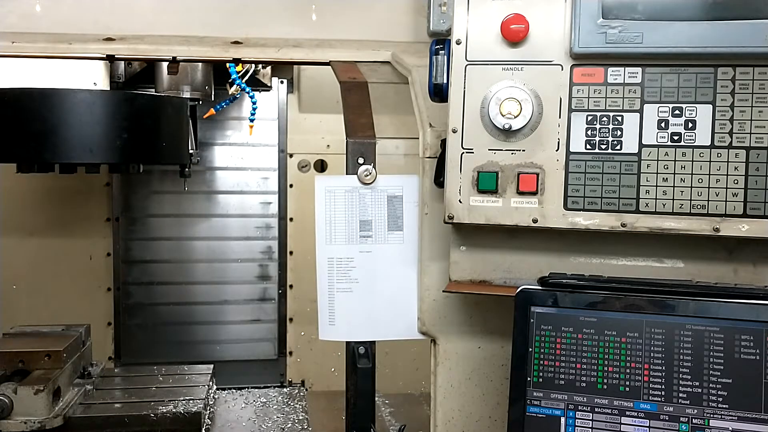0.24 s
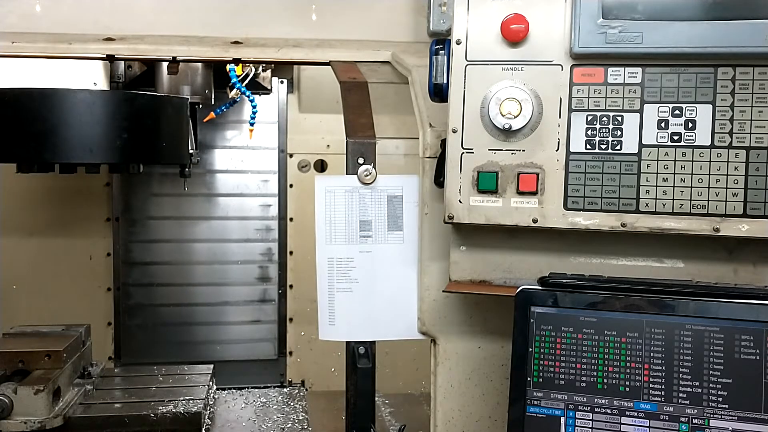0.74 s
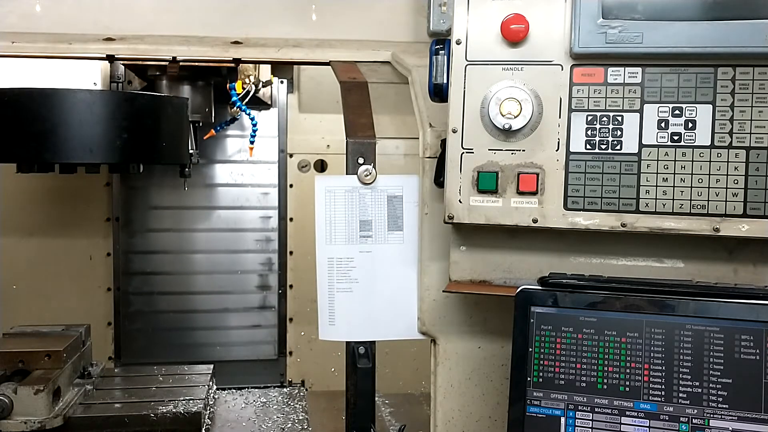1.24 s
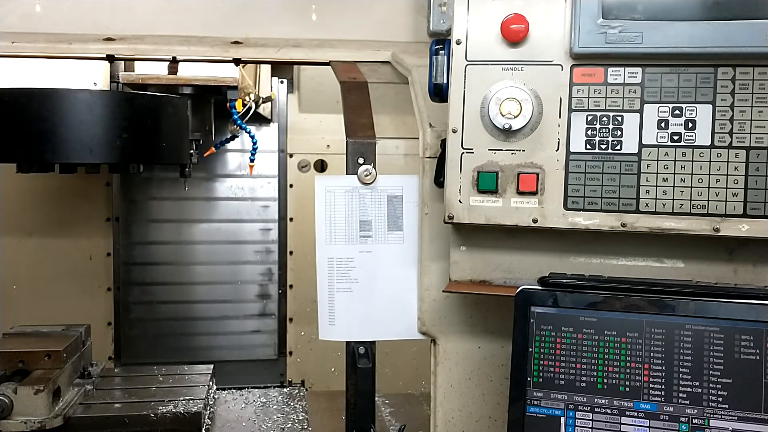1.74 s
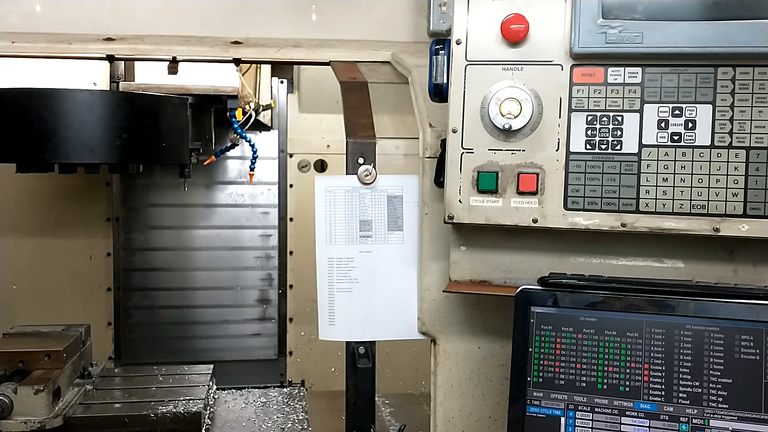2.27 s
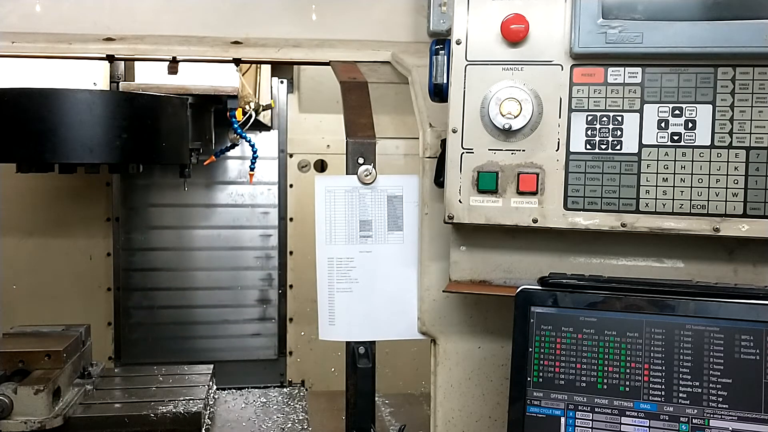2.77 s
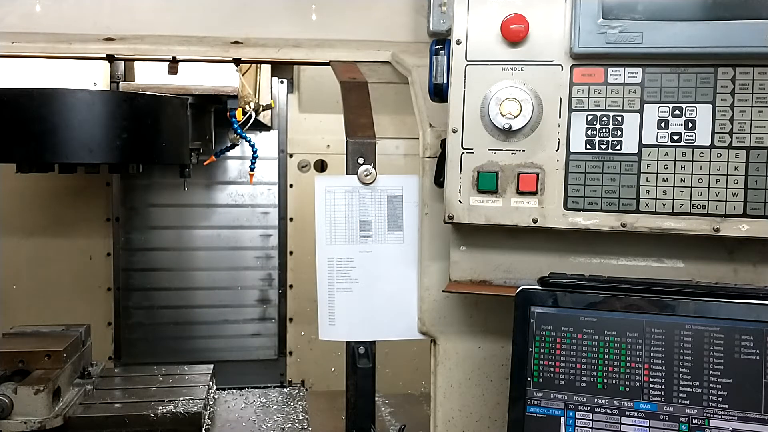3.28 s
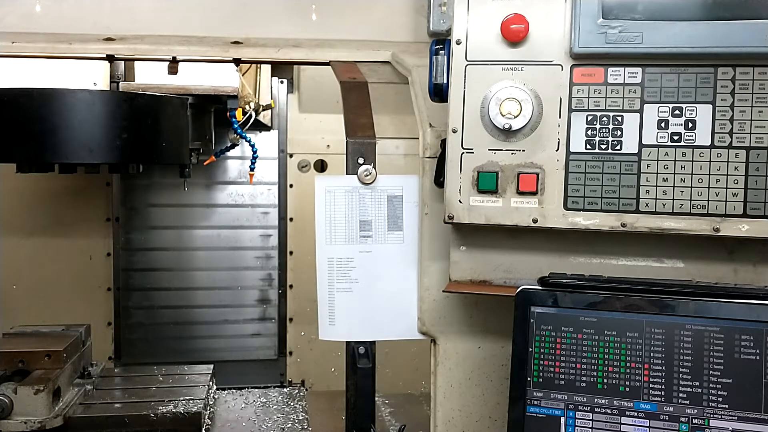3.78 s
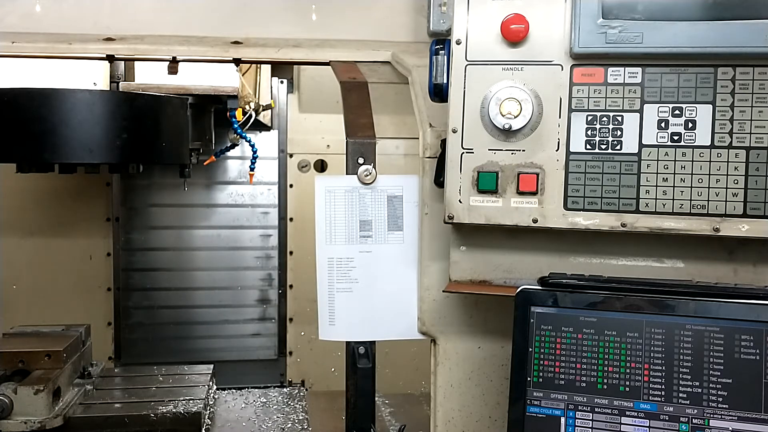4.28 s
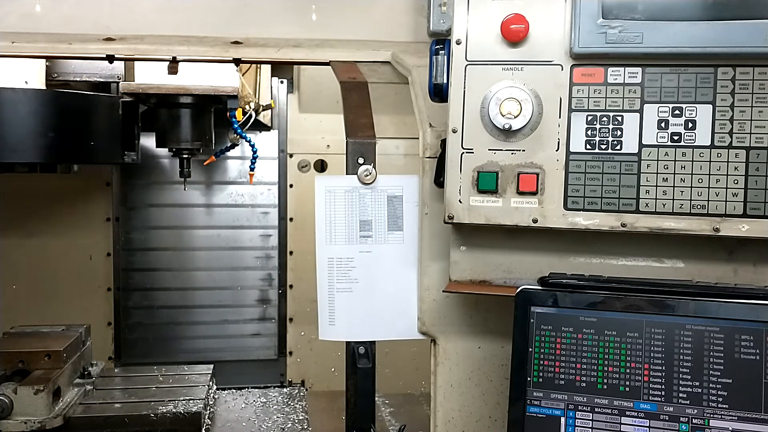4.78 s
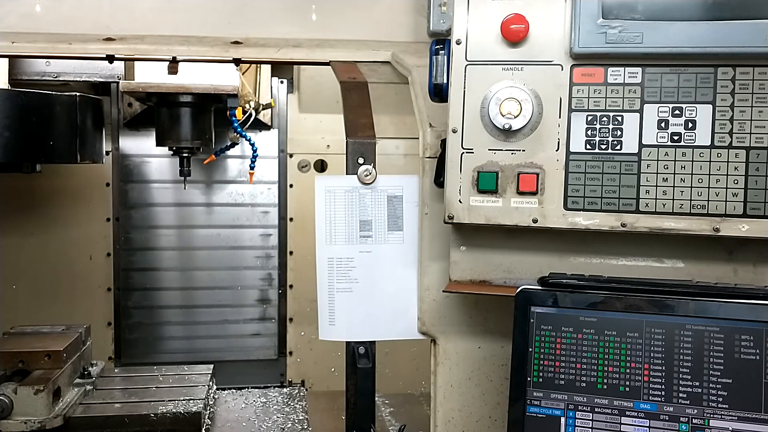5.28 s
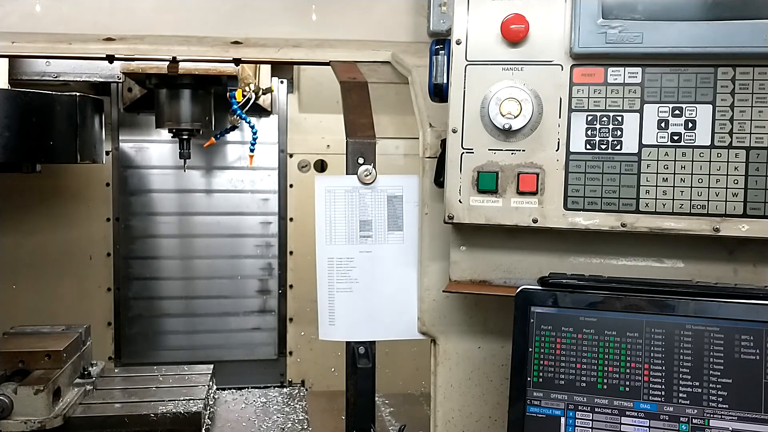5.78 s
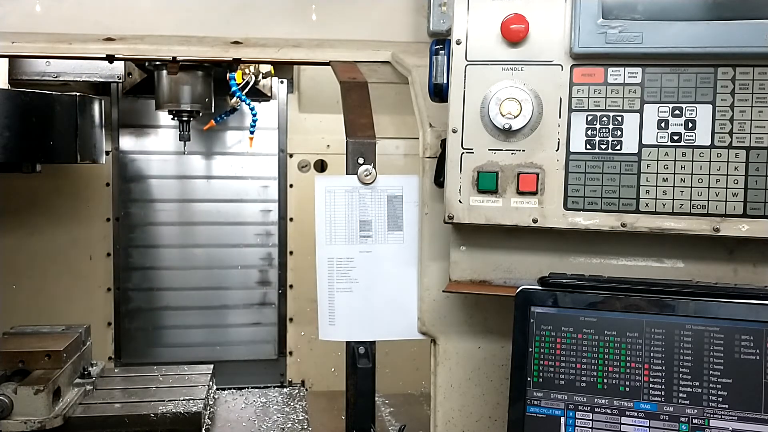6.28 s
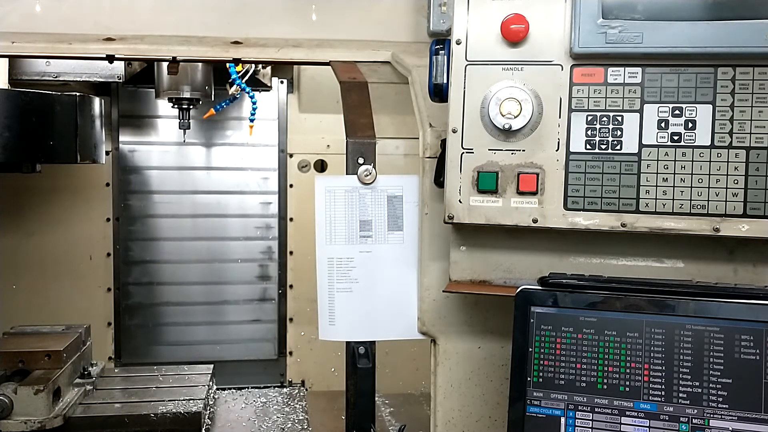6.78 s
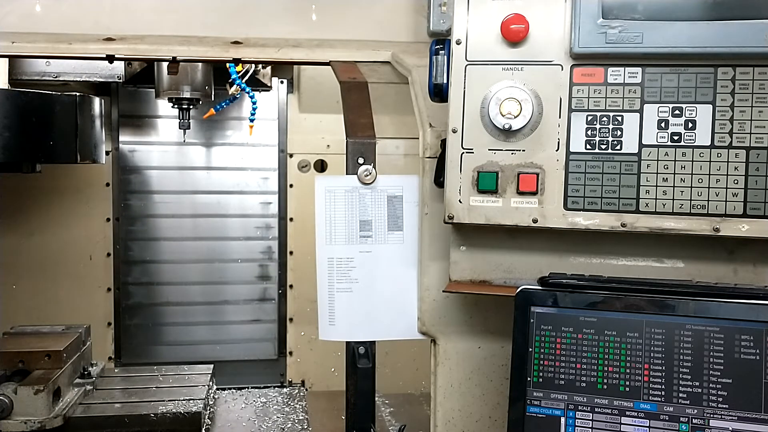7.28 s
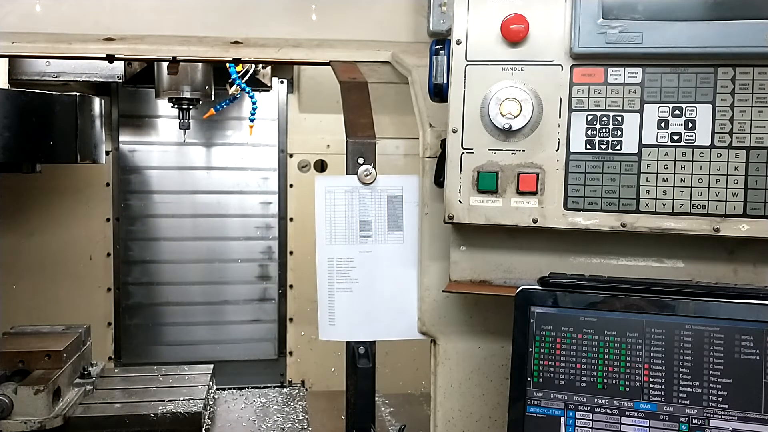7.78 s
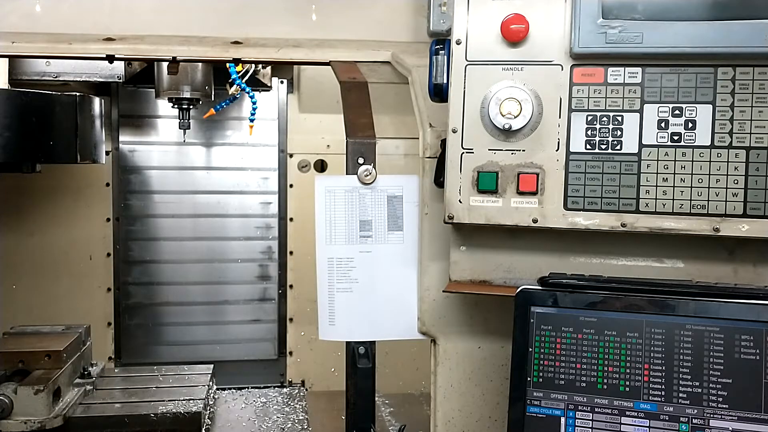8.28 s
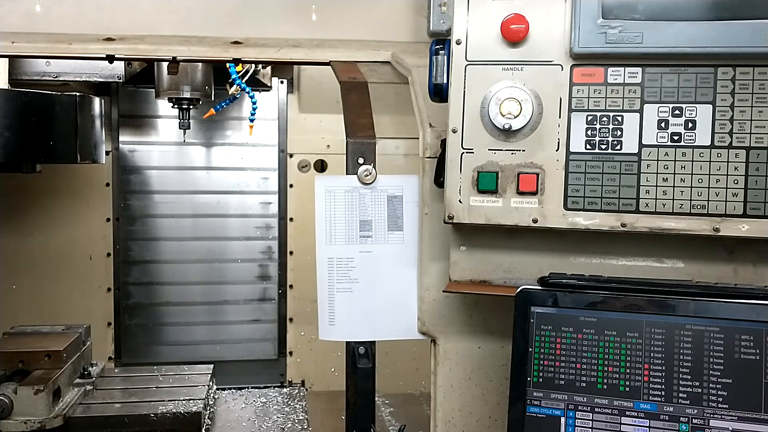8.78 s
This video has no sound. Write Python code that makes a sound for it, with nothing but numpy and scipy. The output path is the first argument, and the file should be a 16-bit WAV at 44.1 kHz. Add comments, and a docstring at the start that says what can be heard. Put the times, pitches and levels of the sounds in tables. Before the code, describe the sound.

Close to a milling machine in a workshop, a tool change opens with a strong hissing rush of air, echoing briefly off steel walls. It narrows to a squeal and stops, followed by clunks and a quick exhaust hiss. A small motor then whines, rattles and hits its end stop. A feed drive growls for over a second and a valve gives a sharp puff, leaving the steady fan and mains hum.

```python
"""A roar of air from a milling machine's spindle taper opens a tool change. As the head sinks onto the
holder, the air thins to a whistle and is shut off; the drawbar clamps with a clunk and vents.
The carousel's motor whines into its end stop, the head rises on a growling servo and a valve puffs.
Fans and mains hum throughout; the sheet-metal enclosure echoes around the air blasts."""
import sys
import numpy as np
from scipy import signal
from scipy.fft import rfft, irfft, next_fast_len
from scipy.io import wavfile
from scipy.ndimage import uniform_filter1d, map_coordinates

SR = 44100
rng = np.random.default_rng(int(sys.argv[2]) if len(sys.argv) > 2 else 0)


def transcribe(signal):
    """Save signal, clipped to [-1, 1], as a 16-bit WAV file at the path in sys.argv[1]."""
    frames = np.atleast_2d(signal).T
    limited = np.clip(frames, -1, 1)
    pcm = np.round(limited * 32767).astype(np.int16)
    wavfile.write(sys.argv[1], SR, pcm)


N = 398220
T = np.arange(N) / SR

# the spindle sinking onto the holder: time_s, closure (0 open, 1 seated)
GAP_CLOSURE = [(.95, 0.019), (1.15, 0.095), (1.5, 0.32), (1.745, 0.63), (1.83, 0.88), (1.94, 0.96)]
# the jet's level as the gap closes: open_db, turn_closure, turn_db, seated_db
JET_THROTTLE = (-15.5, 0.78, -17, -41.5)
# metallic crack of struck panels: freq_hz, level_db
CRACK_SPECTRUM = [(250, -13), (600, 8), (900, -2), (1200, -5), (1600, 5.5), (2300, 5), (4000, 2),
                  (5200, -3), (7300, 13), (11000, -9), (16000, -16)]
PURGE_OFF_S, PURGE_FALL_DB_PER_S = 1.998, 193


def air_purge():
    """The jet roars; the closing gap retunes the cavity, hisses higher and at last whistles."""
    # roar of the jet and hiss of the gap: freq_hz, level_db
    jet_spectrum = [(300, -84), (700, -32), (1200, -17), (1950, -15.5), (2400, -2), (3000, -2), (3600, -2),
                    (4900, -3), (5700, -8), (6700, -11), (8500, -4), (9800, -4), (11500, -13.5),
                    (13000, -30), (14600, -7), (16000, -28)]
    gap_spectrum = [(500, -21), (1500, -7.5), (2500, -2.5), (4200, -12), (6500, -2.5), (9500, -2.5),
                    (12000, -0.5), (14000, -6), (16000, -12)]
    # the hiss as the gap closes: open_db, turn_closure, turn_db, seated_db
    gap_throttle = (-29, 1.1, -27.5, -33.5)
    # cavity between taper and holder:
    # open_hz, seated_hz, width_hz, open_db, turn_closure, turn_db, seated_db
    cavity_modes = [(1049, 700, 70, -44.5, 0.35, -32.5, -40), (2710, 2860, 125, -45, 0.91, -26, -34),
                    (2860, 3400, 99, -48, 0.06, -19.5, -58), (6630, 5380, 270, -44, 0.54, -17, -35),
                    (9130, 9250, 420, -39, 0.86, -18, -43)]
    # the gap's edge tone catching: start_s, length_s, pitch_hz, level_db
    chirps = [(1.745, .06, 13500, -27), (1.868, 0.023, 14080, -26), (1.937, 0.017, 12700, -10),
              (1.972, .025, 12730, -19.5)]
    closure = curve(GAP_CLOSURE)
    roar = undb(-1) * noise(colour(jet_spectrum), band=(3300, 4900)) * throttled(closure, *JET_THROTTLE)
    hiss = noise(colour(gap_spectrum), band=(10800, 12200)) * throttled(closure, *gap_throttle)
    surge = undb(.5 * walk(8.73))
    air = holder_echo(roar * surge + hiss)
    for open_hz, seated_hz, width_hz, *throttle in cavity_modes:
        ring = blown(open_hz + (seated_hz - open_hz) * closure, width_hz)
        air += ring * throttled(closure, *throttle) * undb(walk(18))
    # just before it seals, the slit shrieks upwards
    shriek_s, hold_s = 1.85, .07
    shriek = blown(10760 + 26000 * np.clip(T - shriek_s, 0, hold_s), width_hz=3200)
    air += undb(-16.5) * shriek * envelope(shriek_s, shriek_s + hold_s, rise_s=.024, fall_db_per_s=480)
    for start, length, hz, db in chirps:
        gate = envelope(start, start + length, rise_s=.012, fall_db_per_s=478.5)
        air += undb(db) * tone(hz, spread_hz=70, rate=400) * gate
    flutter_db = .58 * walk(59.26)
    return air * undb(flutter_db) * shutoff()


def holder_echo(air):
    """The holder's face throws the treble back; as it nears, the echo's comb sweeps upwards."""
    # the reflection: time_s, lag_ms, gain
    echo = [(.55, .6, 0), (.9, .5, .17), (1.12, .447, .25), (1.4, .4, .22), (1.75, .34, 0)]
    treble = filtered(air, lambda f: treble_share(f, 4000))
    delayed = map_coordinates(treble, [(T - curve(echo) / 1000) * SR], order=3)
    return air + curve(echo, column=2) * delayed


def spindle_nose():
    """The wandering jet rings the spindle nose, favouring now some resonances, now others."""
    # ring of the nose: pitch_hz, width_hz, level_db
    modes = [(2602, 11, 3), (2632, 10, -2), (2746, 11, 7.5), (2838, 14, -2), (2931, 12, -1), (3441, 14, 4),
             (3589, 17, 1.5), (3676, 15, 1), (4197, 12, -6), (4239, 12, -3), (4412, 12, -3), (4664, 18, -3),
             (4885, 16, -5), (8470, 50, -7), (9117, 16, -3)]
    ring = sum(filtered(rng.standard_normal(N), resonances(modes[k::3])) * undb(1.5 * walk(4))
               for k in range(3))
    flow = throttled(curve(GAP_CLOSURE), *JET_THROTTLE) * shutoff()
    return undb(-1) * flow * ring / ring.std()


def exhausts():
    """The drawbar cylinder dumps its air and the rest seeps out; a valve puffs once the head stops."""
    # rush of the drawbar vent and of the valve: freq_hz, level_db
    vent_spectrum = [(300, -13), (1400, -9), (3300, -6), (4200, -3), (5500, -2.5), (7200, 0.5), (9300, 2),
                     (11000, -5), (13000, -6.5), (16000, -15)]
    puff_spectrum = [(800, -34), (2500, -11), (4000, -12), (5200, -6), (6600, -8), (8300, 3.5), (9700, 1),
                     (11000, -13), (13000, -13), (16000, -23)]
    # ring of the exhaust port: pitch_hz, width_hz, level_db, sag_db_per_s
    port_modes = [(4140, 200, -35, 15), (5550, 280, -35, 45), (7130, 430, -24, 140)]
    vent_s, dumped_s = 2.234, 2.414
    dump = undb(-18) * envelope(vent_s, dumped_s, rise_s=.014, fall_db_per_s=200, sag_db_per_s=61)
    seep = undb(-37.5) * envelope(vent_s, 2.764, rise_s=.12, fall_db_per_s=60, sag_db_per_s=20.5)
    puff = undb(-29) * envelope(6.858, 6.88, rise_s=.011, fall_db_per_s=131, sag_db_per_s=40)
    air = noise(colour(vent_spectrum)) * (dump + seep) + noise(colour(puff_spectrum)) * puff
    for hz, width_hz, db, sag in port_modes:
        rush = envelope(vent_s, dumped_s, rise_s=.017, fall_db_per_s=200, sag_db_per_s=sag)
        air += undb(db) * blown(hz, width_hz) * rush
    # the port whistles as the pressure runs out
    whistle = undb(-38) * envelope(2.375, 2.437, rise_s=.02, fall_db_per_s=300, sag_db_per_s=70)
    return air + blown(12300, width_hz=120) * whistle


def clunks():
    """The drawbar clamps, the carousel knocks into its stop and the valve's spool clacks home."""
    # hits on each body: start_s, ring_db, contact_cutoff_hz, crack_db
    head_blows = [(2.035, -35.5, 404, -52), (2.078, -32, 304, -40), (2.236, -30.5, 1500, -28.5),
                  (2.245, -58.5, 1474, -27), (2.259, -37, 1500, -51), (2.312, -29, 130, -66),
                  (2.331, -26, 126, -62)]
    carousel_blows = [(4.405, -40, 196, -46), (4.587, -58, 3500, -32.5), (4.604, -56, 3500, -40.5),
                      (4.752, -35, 179, -63), (4.852, -38, 177, -65), (5.186, -34, 2950, -54),
                      (5.196, -30.5, 2000, -37), (5.208, -32.5, 1500, -62), (5.231, -31.5, 1100, -63),
                      (5.265, -44, 1496, -70)]
    valve_blows = [(6.898, -37.5, 6000, -31.5)]
    # ring of each body: pitch_hz, level_db, t60_s
    head_modes = [(74, -18, 0.98), (106, -3.5, 0.36), (122, -13, 0.29), (152, -6.5, 0.49), (206, -2, 0.17),
                  (410, -12, 0.12), (567, -7, 0.13), (686, -9, 0.3), (924, -2, 0.11), (1436, -6, 0.09),
                  (1470, -17, .2), (2940, 6.5, 0.086)]
    carousel_modes = [(133.5, -4.5, 0.55), (188, -3, 0.307), (335, -11, 0.073), (416, 1.5, 0.088),
                      (456, 2, 0.045), (651, -5, 0.21), (882, -4.5, 0.19), (1470, -11, 0.18),
                      (1610, -11, 0.46), (1910, -11, 0.4), (2960, -19, 0.28), (3360, -13.5, .25),
                      (3760, -1, .25)]
    valve_modes = [(1550, -5, 0.57), (1680, 2, 0.29), (1750, -9, 0.23), (2730, -7, 0.43), (3600, -6, 0.39),
                   (4320, -5, 0.28)]
    # broader clack of the carousel's carriage: freq_hz, level_db
    clack = [(250, -12), (600, -6), (1300, 5.5), (2300, 2.5), (4000, 3), (5200, -5), (7300, 10), (10000, 0),
             (13000, -5), (16000, 2)]
    return (strike(head_blows, head_modes, CRACK_SPECTRUM, crack_t60=.27, boom_db=0, boom_t60=.14)
            + strike(carousel_blows, carousel_modes, clack, crack_t60=.29, boom_db=-4.5, boom_t60=.4)
            + strike(valve_blows, valve_modes, CRACK_SPECTRUM, crack_t60=.43, boom_db=-20, boom_t60=.15))


def strike(blows, modes, crack_spectrum, crack_t60, boom_db, boom_t60):
    """Each blow cracks, rings the body and booms in its panels; a soft contact dulls ring and boom."""
    # dull boom of the panels: freq_hz, level_db
    boom_spectrum = [(70, -10), (140, 7.5), (260, -7.5), (450, 6), (900, -4), (1150, -8.5), (1700, -1),
                     (3000, -9), (5000, -26)]
    out, t = np.zeros(N), T[:SR // 3]
    hz, mode_db, t60 = np.transpose(modes)[:, :, None]
    polarity = (-1) ** np.arange(len(hz))[:, None]
    decay = polarity * undb(mode_db - 60 * t / t60)
    crack, boom = noise(colour(crack_spectrum)), noise(colour(boom_spectrum))
    for start, ring_db, contact_hz, crack_db in blows:
        span = slice(int(start * SR), int(start * SR) + len(t))
        detune = 1 + .0161 * rng.standard_normal(hz.shape)
        ring = (decay * np.sin(2 * np.pi * hz * detune * t)).sum(0)
        ring += undb(boom_db - 60 * t / boom_t60) * boom[span]
        softened = signal.lfilter(*signal.butter(2, contact_hz, fs=SR), ring)
        out[span] += undb(ring_db) * softened + undb(crack_db - 60 * t / crack_t60) * crack[span]
    return out


def carousel(start_s=4.32, stop_s=5.2, spin_up_s=.085, chatter_db=2.2):
    """A motor whines and its brushes chatter; the carriage rumbles and rubs along its rail."""
    # the whine follows the motor's speed: time_s, pitch_hz
    whine_pitch = [(4.33, 1677), (4.39, 1798), (4.46, 1854), (4.55, 1860), (4.68, 1856), (5.09, 1913),
                   (5.21, 1893)]
    # its harmonics, from the first up: level_db
    harmonics = [-0.5, -13, -9, -2, -1, -11, -11, -17]
    # level ride on the first harmonic: time_s, gain_db
    lowest_ride = [(4.42, -1), (4.56, -11), (4.82, -3.5), (4.92, 1.5), (5.02, 3.5), (5.2, 1)]
    # scratch of the brushes, also heard in the rubs: freq_hz, level_db
    scratch = [(400, 5.5), (1200, -4), (3000, 1), (4500, -12), (6500, 2), (9000, 1.5), (11500, -9),
               (16000, -21)]
    # rubs on the rail before the stop: start_s, length_s, level_db
    rubs = [(5.07, 0.037, -40.5), (5.149, 0.097, -40)]
    hz, age = curve(whine_pitch) + 3 * walk(40), T - start_s
    lowest, *upper = [undb(db) * tone(k * hz, spread_hz=12 * k, rate=300)
                      for k, db in enumerate(harmonics, 1)]
    whine = sum(partial * undb(chatter_db * walk(40)) for partial in upper)
    whine += lowest * undb(curve(lowest_ride))
    # weaker tones between the harmonics
    whine += undb(-14) * sum(tone((k + .5) * hz, spread_hz=16.4, rate=430) for k in range(3, 8))
    whine *= undb(-51 + 1.5 * age)
    brushes = noise(colour(scratch)) * undb(-46 - 3 * age + chatter_db * walk(110))
    motor = (whine + brushes) * np.clip(age / spin_up_s, 0, 1)
    rumble = noise(resonances([(90, 22, 5), (126, 9.1, 14), (199, 42, 3.5), (400, 150, -16)]))
    rumble *= undb(-45.5 + 2 * walk(11)) * envelope(start_s, 4.82, rise_s=.02, fall_db_per_s=90)
    rub = noise(resonances([(3026, 95, 4), (3400, 61, -1), (3730, 100, 0)]))
    rub += undb(.5) * noise(colour(scratch))
    rub *= sum(undb(db) * envelope(start, start + length, rise_s=.027, fall_db_per_s=200)
               for start, length, db in rubs)
    return (motor + rumble) * envelope(start_s, stop_s, rise_s=.017, fall_db_per_s=198) + rub


def axis_drive(rise_s=.13, swell_db_per_s=2):
    """Balls rolling in the feed screw ring the column; the servo's growl swells along each move."""
    # moves of the head: start_s, stop_s, screw_db, servo_db
    moves = [(0.715, 2.002, -45, -50), (1.984, 2.149, -40.5, -46), (5.285, 6.65, -41.5, -46)]
    # ring of the column and of the servo drive: pitch_hz, width_hz, level_db
    column_modes = [(664, 15.7, 3), (703, 12, -3), (846, 34, -9)]
    servo_modes = [(1480, 190, -6.5), (1688, 23, 2.5), (2000, 27, -2.5), (2330, 940, -13.5)]
    # level ride on the column as the head rises and brakes: time_s, gain_db
    column_ride = [(5.45, 0.5), (5.53, -2.5), (5.66, 0), (5.82, -3.5), (5.95, -2.5), (6.15, 2.5), (6.35, 0),
                   (6.62, -1.5), (6.7, 3.5), (6.76, 2)]
    # one servo resonance sinks as the head rises: time_s, pitch_hz
    sinking_pitch = [(5.42, 2153), (5.78, 1854), (6.0, 1715), (6.3, 1666), (6.6, 1508)]
    rolling = noise(resonances(column_modes), band=(620, 760)) * undb(curve(column_ride))
    sinking = undb(-10) * blown(curve(sinking_pitch), width_hz=100)
    growl = (noise(resonances(servo_modes)) + sinking) * undb(walk(45))
    out = np.zeros(N)
    for start, stop, screw_db, servo_db in moves:
        swell_db = swell_db_per_s * np.clip(T - start, 0, stop - start)
        out += undb(screw_db) * rolling * envelope(start, stop, rise_s, fall_db_per_s=68)
        out += undb(servo_db + swell_db) * growl * envelope(start, stop, rise_s, fall_db_per_s=103)
    return out


def enclosure(x, tail_t60=.26):
    """Close steel walls throw dense early echoes and a short tail; the bass arrives as one wave."""
    t = T[:SR // 2]
    decay = np.exp(-t / .008) + undb(-14 - 60 * t / tail_t60)
    response = rng.standard_normal((2, len(t))) * decay
    for _ in range(2):  # flatten the broad colour, keep the fine ripple
        spectrum = rfft(response, len(t))
        broad_colour = np.sqrt(uniform_filter1d(abs(spectrum) ** 2, size=120))
        response = irfft(spectrum / broad_colour, len(t))[:, :SR // 3]
    echoes = signal.fftconvolve(x[None], response, axes=1)[:, :N]
    return crossover(x, echoes, split_hz=650)


def workshop(fan_hz=275.3):
    """Wavering fan and mains tones over a low rumble and the thin hiss of leaking air."""
    # fans and mains: pitch_hz, level_db
    hum_tones = [(56, -62.5), (87, -61.5), (119, -55.5), (240, -79), (299, -66.5), (365, -65), (480, -68),
                 (551.5, -55), (599, -71.5), (717, -61), (827.5, -61.5), (959, -84), (1103, -76),
                 (1378, -71)]
    # brief dips in the strongest fan tone: centre_s, half_length_s, depth_db
    fan_dips = [(1.104, 0.21, -3), (1.732, 0.083, -7), (2.806, 0.32, -4), (3.875, 0.061, -9),
                (4.075, 0.12, -5), (4.452, 0.08, -6), (5.246, 0.18, -12.5), (5.863, 0.085, -10),
                (7.09, 0.035, -24), (7.85, 0.036, -8), (8.288, 0.067, -21), (8.514, 0.045, -19),
                (8.793, 0.064, -3)]
    # shop rumble and air leak: freq_hz, level_db
    rumble_spectrum = [(15, -51), (25, -21), (108, -1), (220, -3), (273, -5), (334, -12), (499, -5.5),
                       (548, -16), (610, -11), (712, -10), (1000, -16.5), (1300, -68), (2200, -120)]
    leak_spectrum = [(500, -57), (900, 3), (1400, 8), (1900, 1), (2700, 4), (3300, -5.5), (4400, -3),
                     (5200, -1.5), (6500, -6), (7600, -1), (8500, 0.5), (9600, -2), (10300, -8),
                     (11400, -16), (12400, -7), (14300, -18.5), (16000, -55)]
    hum = sum(undb(db + 2 * walk(5)) * tone(hz, spread_hz=.877, rate=8) for hz, db in hum_tones)
    dip_db = sum(db * np.exp(-((T - centre) / half) ** 2) for centre, half, db in fan_dips)
    fan = undb(-47.5 + dip_db + 2.2 * walk(23)) * tone(fan_hz, spread_hz=1.7, rate=10)
    fan += undb(-58) * blown(fan_hz, width_hz=8)  # similar fans beat against it
    rumble = wide(lambda: noise(colour(rumble_spectrum), band=(60, 220)), split_hz=364)
    leak = wide(lambda: noise(colour(leak_spectrum)), split_hz=430)
    return hum + fan + undb(-50 + .21 * walk(3.3)) * rumble + undb(-53 + .079 * walk(2.93)) * leak


def throttled(closure, open_db, turn_closure, turn_db, seated_db):
    """Gain as the gap closes: from its open level, through a turning point, to its seated level."""
    return undb(np.interp(closure, [0, np.clip(turn_closure, .01, .99), 1], [open_db, turn_db, seated_db]))


def shutoff():
    """Gain of the purge air, dying fast once it is shut off."""
    return undb(-PURGE_FALL_DB_PER_S * np.maximum(T - PURGE_OFF_S, 0))


def envelope(start, stop, rise_s, fall_db_per_s, sag_db_per_s=0):
    """Gain that rises at the start, sags while held and dies away after the stop."""
    age = np.maximum(T - start, 0)
    loss_db = sag_db_per_s * np.minimum(age, stop - start) + fall_db_per_s * np.maximum(T - stop, 0)
    return np.minimum(age / rise_s, 1) * undb(-loss_db)


def undb(db):
    """Decibels to gain."""
    return 10 ** (np.asarray(db) / 20)


def curve(rows, column=1):
    """One column of a table, joined by straight lines in time."""
    rows = np.array(rows)
    return np.interp(T, rows[:, 0], rows[:, column])


def filtered(x, response):
    """Apply a response, given as a function of frequency."""
    size = next_fast_len(x.shape[-1], True)
    f = np.arange(size // 2 + 1) * SR / size + 1e-3
    return irfft(rfft(x, size) * response(f), size)[..., :x.shape[-1]]


def colour(points):
    """EQ curve through (freq_hz, level_db) points, falling steeply below the first."""
    hz, db = np.transpose(points)
    return lambda f: undb(np.interp(np.log(f), np.log(hz), db)) * np.minimum(f / hz[0], 1) ** 2


def resonances(modes):
    """EQ curve of (pitch_hz, width_hz, level_db) peaks with dark valleys between them."""
    return lambda f: sum(undb(db) / (1 + ((f - hz) / width) ** 2) for hz, width, db in modes)


def noise(response, band=(0, SR)):
    """Coloured noise with rms 1 inside a band."""
    x = filtered(rng.standard_normal(N), response)
    f = np.arange(1, SR // 2)
    power = response(f) ** 2
    return x / x.std() * np.sqrt(power.sum() / power[(f > band[0]) & (f < band[1])].sum())


def walk(rate):
    """Random drift with spread near 1, turning about `rate` times a second."""
    steps = rng.standard_normal(size=65536)
    return 1.222 * np.interp(T * rate, np.arange(len(steps)), steps)


def tone(hz, spread_hz, rate):
    """A sine of rms 1 whose pitch wanders."""
    return np.sqrt(2) * np.sin(2 * np.pi * np.cumsum(hz + spread_hz * walk(rate)) / SR)


def blown(hz, width_hz):
    """A resonance fed by turbulence; its centre may move."""
    phase = 2 * np.pi * np.cumsum(np.broadcast_to(hz, N)) / SR
    return walk(2 * width_hz) * np.cos(phase) + walk(2 * width_hz) * np.sin(phase)


def treble_share(f, split_hz):
    """High-pass gain: 0 in the bass, 1 in the treble."""
    return 1 / np.sqrt(1 + (split_hz / f) ** 3)


def crossover(low, high, split_hz):
    """Equal-power blend of one signal's bass with another's treble."""
    bass = filtered(low, lambda f: np.sqrt(1 - treble_share(f, split_hz) ** 2))
    return bass + filtered(high, lambda f: treble_share(f, split_hz))


def wide(source, split_hz):
    """A large source: its bass reaches both sides alike, its treble comes from different places."""
    return crossover(source(), np.array([source(), source()]), split_hz)


def scene():
    """The air and the moving parts, over the hum of the shop."""
    # air escapes on both sides of the spindle; each channel favours its own stream
    left, right = (enclosure(air_purge() + exhausts()) for _ in range(2))
    pan = np.array([[.93], [.37]])
    air = pan * left + pan[::-1] * right
    nose = np.array([spindle_nose(), spindle_nose()])
    machinery = wide(lambda: carousel() + axis_drive() + clunks(), split_hz=730)
    return air + nose + machinery + workshop()


def record(dry, threshold_db=-20, ratio=1.39, window_s=.1, top_hz=15800):
    """Each microphone has its own colour; a compressor eases the loud air down; the top is cut."""
    # balance of the two microphones: freq_hz, left_minus_right_db
    balance = [(110, 1), (200, 1), (300, -7.5), (420, 2.5), (600, 0), (2400, 2), (4400, 0.5), (6300, 4),
               (8300, -3), (12000, -0.5)]
    hz, balance_db = np.transpose(balance)
    sides = np.array([[.5], [-.5]])
    heard = filtered(dry, lambda f: undb(sides * np.interp(np.log(f), np.log(hz), balance_db)))
    level_db = 10 * np.log10(uniform_filter1d((heard ** 2).mean(0), size=int(window_s * SR)))
    heard *= undb((1 / ratio - 1) * np.maximum(level_db - threshold_db, 0))
    return signal.sosfilt(signal.ellip(10, .2, 80, top_hz, fs=SR, output="sos"), heard)


dry = scene()
out = record(dry)
transcribe(out)
```